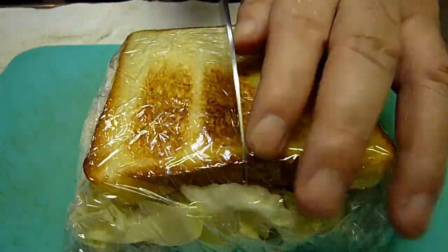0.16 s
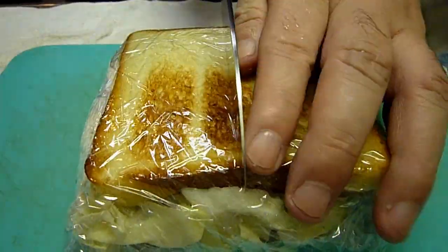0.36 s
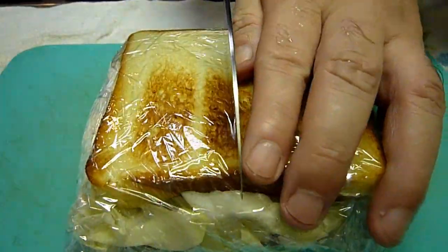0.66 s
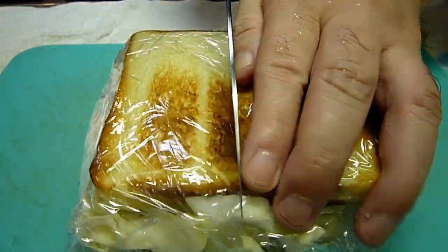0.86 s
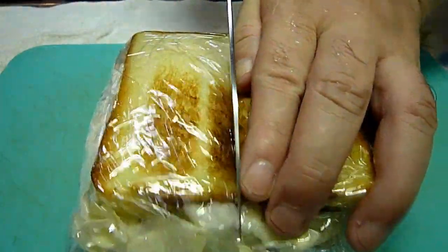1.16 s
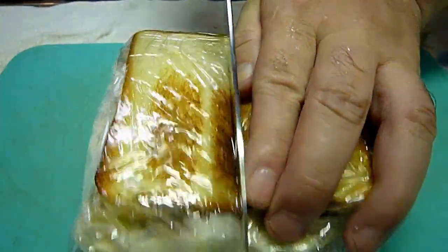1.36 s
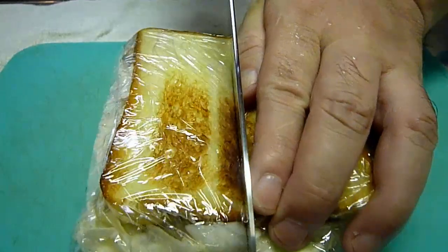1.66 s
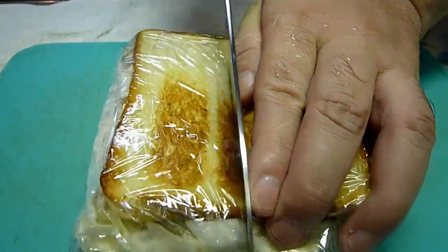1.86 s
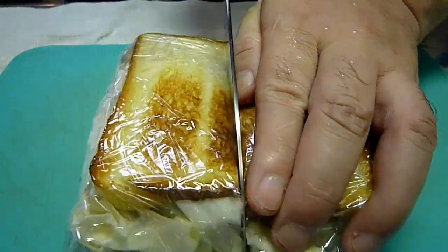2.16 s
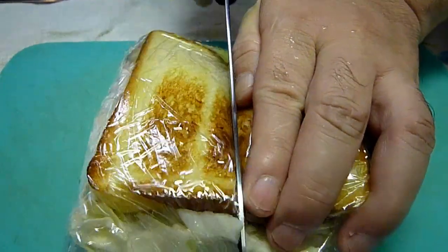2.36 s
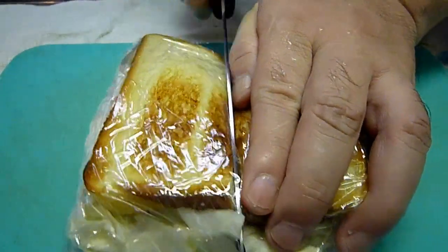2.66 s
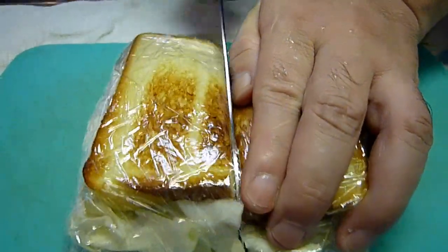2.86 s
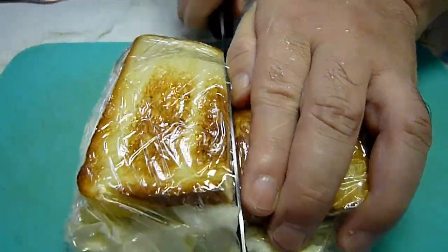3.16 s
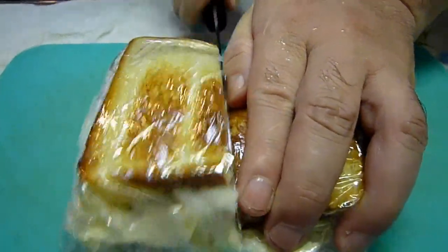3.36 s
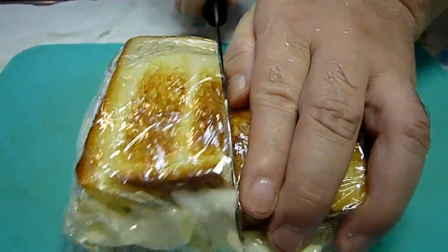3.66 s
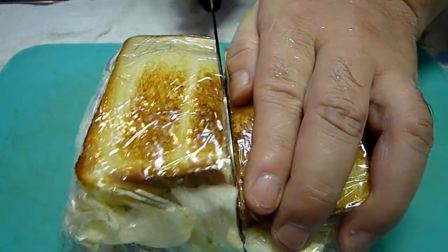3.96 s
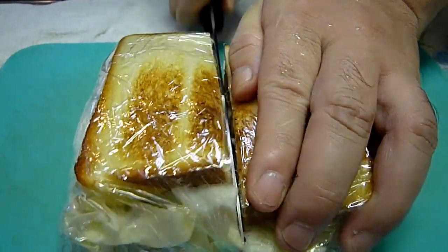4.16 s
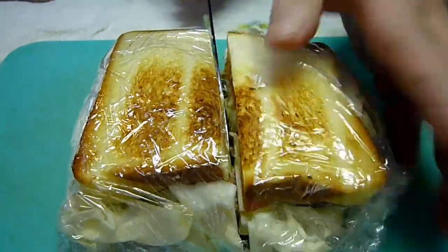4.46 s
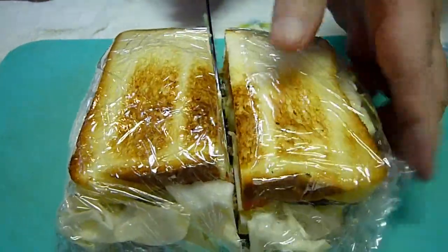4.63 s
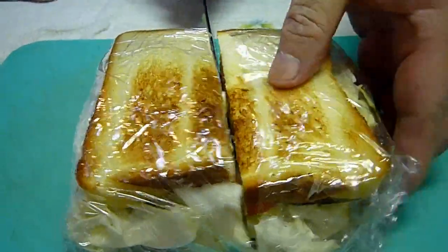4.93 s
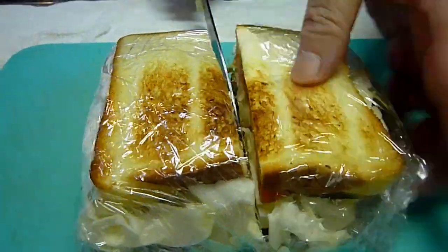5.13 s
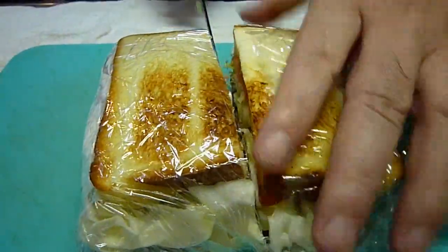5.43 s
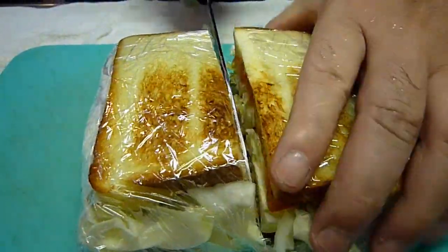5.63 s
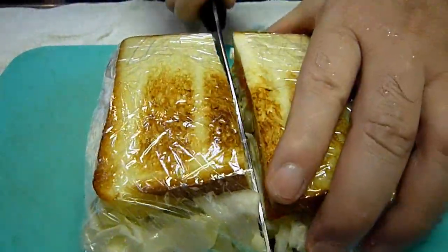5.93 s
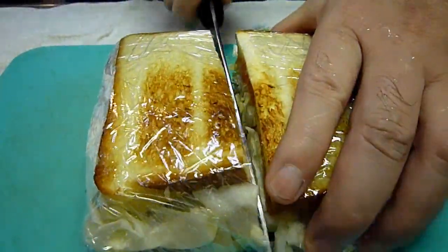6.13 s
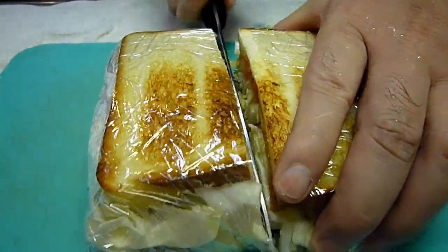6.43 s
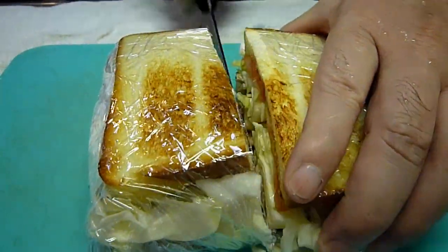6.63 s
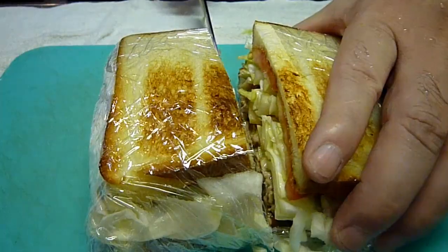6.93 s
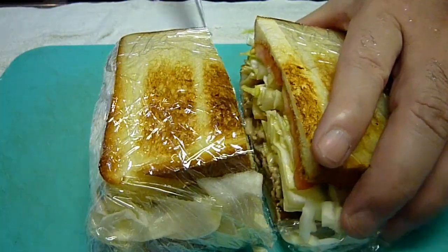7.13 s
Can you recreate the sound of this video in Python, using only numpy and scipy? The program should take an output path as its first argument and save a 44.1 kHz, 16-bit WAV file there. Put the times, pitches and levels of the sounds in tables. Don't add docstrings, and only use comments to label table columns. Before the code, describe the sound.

Close, dry crunching strokes of a blade through film-wrapped toast, softer in the filling, a rustling pause, then hard thumping final cuts.

```python
import sys
import numpy as np
from scipy import signal
from scipy.fft import rfft, irfft, dct, next_fast_len
from scipy.io import wavfile
from scipy.ndimage import uniform_filter1d, map_coordinates

SR = 44100
rng = np.random.default_rng(int(sys.argv[2]) if len(sys.argv) > 2 else 0)


def file_out(sig):
    cols = np.atleast_2d(sig).T
    lim = np.clip(cols, -1, 1)
    pcm = np.round(lim * 32767).astype(np.int16)
    wavfile.write(sys.argv[1], SR, pcm)


def volts(x):
    e = np.asarray(x, float) / 20
    return 10 ** e


N = 321489

# (pitch [Hz], width [Hz], level [dB])
BOARD_LOW = [(153.4, 11, -0.5), (195, 15, -3), (235.8, 25, -3.5)]
BOARD_HIGH = [(359.5, 25, 1), (410.4, 20, 4), (458.2, 64, -0.5), (580, 190, -11)]
BITING = (0.45, 2)


def unit(x, span=.09):
    width = round(span * SR)
    power = uniform_filter1d(uniform_filter1d(x ** 2, width), width)
    return x / np.sqrt(np.abs(power) + 1e-20)


def curves(rows):
    s, *cols = np.transpose(rows)
    index = np.arange(len(s))
    place = np.interp(np.arange(N) / SR, s, index)
    eased = place - 0.24 * np.sin(2 * np.pi * place) / (2 * np.pi)
    return [np.interp(eased, index, c) for c in cols]


def filtered(x, response):
    m = next_fast_len(N + SR // 2)
    return irfft(rfft(x, m) * response(np.fft.rfftfreq(m, 1 / SR)), m)[:N]


def colour(points):
    f, db = np.transpose(points)
    return lambda hz: volts(np.interp(np.log(hz + 1), np.log(f + 1), db))


def modes(rows):
    def response(f):
        total = 0
        for k, (hz, wide, db) in enumerate(rows):
            total = total + (-1) ** k * volts(db) * 1j * f * wide / (hz * hz - f * f + 1j * f * wide)
        return total
    return response


def wobble(rate):
    coarse = np.arange(0, N + 32, 32)
    knots = rng.standard_normal(int(N * 200 / SR) + 4)
    return np.interp(np.arange(N), coarse, map_coordinates(knots, [coarse * min(rate, 199) / SR]))


def cracks(rate, spread_db, clump_db, bed):
    chance, size = rng.random(N), rng.exponential(size=N)
    sign, rub = rng.standard_normal(N), rng.standard_normal(N)
    breaks = (chance < rate / SR) * sign * volts(spread_db * size)
    return volts(clump_db * wobble(70)) * (breaks / breaks.std() + bed * rub)


def patchy(x, depth_db):
    z = signal.stft(x, nperseg=512)[2]
    field = uniform_filter1d(rng.standard_normal(z.shape), size=3, axis=0)
    field = uniform_filter1d(field, size=7, axis=1)
    return signal.istft(z * volts(depth_db * field / field.std()), nperseg=512)[1][:N]


def efforts(groups, rest_db):
    t = np.arange(0, N + 64, 64) / SR
    power = volts(np.array(rest_db)[:, None]) ** 2
    edge_db = 18
    for rows, (rising, square) in groups:
        for s, length, force_db, *shares_db in rows:
            away = np.where(t < s, (s - t) / rising, (t - s) / (1 - rising)) / length
            layers_db = force_db + np.array([[0.0037, *shares_db]]).T
            power = power + volts(layers_db - edge_db * away ** square) ** 2
    return [np.interp(np.arange(N) / SR, t, layer) for layer in 10 * np.log10(power)]


def kitchen():
    # (pitch [Hz], level [dB])
    murmur = [(8.8, -15), (15, -1), (35, -16.5), (46, -13), (54, -57), (290, -28.5), (366, -52.5),
              (600, -99), (780, -113), (1320, -120)]
    return volts(-68.0) * unit(filtered(rng.standard_normal(N), colour(murmur)), span=1.0)


def room_noise():
    # (time [s], level [dB])
    noise_curve = [(0, -98.5), (.17, -72), (.25, -56), (.29, -67.5), (.35, -58), (.41, -80), (.47, -66),
                   (.85, -64), (.95, -58), (4.5, -60), (5.4, -62.5), (5.8, -63), (6.0, -62.5), (6.9, -59),
                   (7.29, -61.5)]
    # (pitch [Hz], width [Hz], level [dB])
    noise_tones = [(845, 110, -3), (1110, 390, -1), (1400, 190, -1.5)]
    hiss = filtered(patchy(rng.standard_normal(N), depth_db=9.5), lambda f: modes(noise_tones)(f) ** 2)
    return volts(curves(noise_curve)[0]) * unit(hiss)


def slips():
    # (time [s], length [s], force [dB])
    slip_table = [
        (4.745, 0.067, -47),
        (5.268, 0.046, -43.5),
        (7.1, 0.14, -77),
        (7.2, 0.098, -49),
        (7.215, 0.032, -38.5),
    ]
    # (pitch [Hz], width [Hz], level [dB])
    tight_wrap = [(1290, 460, 4.5), (1695, 57, -13), (2450, 140, -8), (3267, 330, -20.5),
                  (4830, 230, -16.5)]
    level_db, = efforts([(slip_table, BITING)], [-120])

    def film(f):
        return sum(volts(db) * modes([(hz, wide, 0)])(f) ** 2 for hz, wide, db in tight_wrap)
    return volts(level_db) * unit(filtered(rng.standard_normal(N), film))


def squeaks():
    # (time [s], peak level [dB], pitch [Hz])
    squeak_table = [(2.765, -61, 12400), (2.765, -64, 10100), (3.432, -61, 11350), (3.838, -62, 11300),
                    (3.955, -42, 8000), (4.178, -62, 11400), (5.18, -68, 4830), (6.1, -62, 11200),
                    (6.12, -61.5, 12000), (6.575, -60, 11100), (6.78, -59, 9700), (7.208, -61.5, 11350)]
    half_s = 0.014
    t, out = np.arange(N) / SR, np.zeros(N)
    for s, db, hz in squeak_table:
        near = slice(round((s - .05) * SR), round((s + .05) * SR))
        swell = np.exp(-((t[near] - s) / half_s) ** 2)
        out[near] += volts(db) * swell * np.sin(2 * np.pi * hz * t[near])
    return out


def board():
    # (time [s], length [s], force [dB], blade
    # contact [dB], heave [dB])
    pushes = [(.02, 0.06, -56.5, -20, 4), (.57, 0.17, -53, 6, -13), (.82, 0.16, -65.5, 12, 0),
              (.97, 0.048, -55, -17, -12), (1.06, 0.15, -53.5, 7, -18), (1.36, 0.16, -48.5, 7, -8),
              (1.68, 0.31, -48.5, -1, -2.5), (1.89, 0.19, -52.5, -0.5, -3.5),
              (2.045, 0.17, -40, 5.5, 1), (2.25, 0.19, -52, -0.5, -15), (2.43, 0.13, -37, 0, -31),
              (2.77, 0.14, -36.5, -5, -17), (2.94, 0.057, -41.5, -9.5, -20),
              (3.07, 0.4, -49.5, -33, -2), (3.3, 0.11, -42, -3.5, -27), (3.4, 0.058, -52.5, 3, 5),
              (3.5, 0.23, -46, -5, -5), (3.59, 0.18, -40.5, -12.5, -2), (3.68, 0.23, -40.5, -7, -12),
              (3.9, 0.28, -46, -4.5, -2), (4.02, 0.16, -46, -2, -6), (4.14, 0.24, -41, -4.5, -7.5),
              (4.3, 0.49, -53, -5.5, -3.5),
              (4.51, 0.033, -61, 13, 0.5), (4.769, 0.17, -47, -3.5, -9), (4.881, 0.18, -49, 0.5, -6),
                   (5.04, 0.098, -37.5, -7.5, -13), (5.1, 0.095, -49.5, 6.5, -26),
                   (5.158, 0.17, -40, 2.5, -14), (5.501, 0.12, -43.5, -17, -13),
                   (6.116, 0.11, -30.5, 0.5, -17), (6.246, 0.063, -23, -7, -30),
                   (6.29, 0.092, -31, 7.5, -27), (6.37, 0.33, -38, 1, -15), (6.459, 0.041, -36.5, -15, -18),
                   (6.56, .17, -39, 6.5, -12), (6.74, 0.19, -52, 3, 3), (6.901, 0.33, -53.5, -3.5, -3),
                   (7.078, 0.14, -50.5, 4.5, -11), (7.22, 0.11, -67, 26.5, -5.5)]
    # (pitch [Hz], width [Hz], level [dB])
    counter_tones = [(64, 29, -3), (31, 5, -12), (114.9, 33, -6)]
    pressing = (0.59, 1.3)
    idle_db = (-58.5, -62, -57)
    levels = efforts([(pushes, pressing)], idle_db)
    low_db, high_db, counter_db = [db + 3 * wobble(8.2) * (db < -52) for db in levels]

    def ring(rows, jolts):
        def body(f):
            return modes(rows)(f) * f ** 6 / (f ** 6 + 135 ** 6) / (1 + (f / 570) ** 6)
        return unit(filtered(jolts, body))
    low = ring(BOARD_LOW, cracks(90, spread_db=3.0, clump_db=0.0, bed=0.61))
    high = ring(BOARD_HIGH, cracks(120, spread_db=1.9, clump_db=2.5, bed=0.66))
    counter = unit(filtered(rng.standard_normal(N), lambda f: modes(counter_tones)(f) ** 2), span=0.66)
    return volts(low_db + 0.7) * low + volts(high_db - 1.5) * high + volts(counter_db + 0.37) * counter


def landings():
    # (time [s], peak level [dB], pitch [Hz], time to fall 60 dB [s])
    landing_table = [(2.059, -20, 153, 0.17), (2.415, -15.5, 234, 0.069), (2.416, -36, 540, 0.09),
                     (2.765, -28.5, 67.4, 0.2), (4.12, -29, 171, 0.2), (4.747, -28, 422.5, 0.12),
                     (5.032, -32, 245, 0.063), (5.148, -31.5, 243.5, 0.19), (6.086, -13.5, 441, 0.05),
                     (6.122, -14, 251, 0.07), (6.233, -13.5, 248, 0.11), (6.273, -15, 395.3, 0.16),
                     (6.313, -23, 160, 0.19), (6.531, -20.5, 404, 0.035), (6.562, -22.5, 423, 0.11),
                     (6.525, -26, 248, 0.11), (6.585, -29, 250, 0.13), (6.543, -26.5, 470, 0.074),
                     (6.59, -24.5, 423, 0.09), (6.293, -15, 334, 0.042)]
    out, t = np.zeros(N + SR), np.arange(SR // 3) / SR
    for s, db, hz, t60 in landing_table:
        swell = 1 - np.exp(-t / 0.0056)
        out[round(s * SR):][:len(t)] += volts(db - 60 * t / t60) * swell * np.sin(2 * np.pi * hz * t)
    return out[:N]


def ticks():
    # (time [s], peak level [dB], pitch [Hz])
    tick_table = [(1.3898, -39.7, 3710), (1.4167, -30, 3400), (1.4269, -28.5, 4470), (1.682, -27.5, 3340),
                  (1.689, -29.5, 3880), (1.7057, -21.5, 3190), (1.7502, -32.5, 3130), (1.7553, -35, 2540),
                  (1.7682, -37.5, 3040), (1.8597, -29.5, 4050), (1.8696, -24.5, 3800),
                  (1.8767, -20.5, 4300), (1.8802, -29, 4300), (1.8874, -36.8, 4700), (1.9802, -41, 3580),
                  (2.0205, -27.5, 2900), (2.025, -24, 3440), (2.0727, -18, 2390), (2.0763, -35, 2270),
                  (2.0867, -34, 3120), (2.2062, -32.5, 2480), (2.2161, -36.5, 3430), (2.3555, -39.5, 2750),
                  (2.3612, -33.5, 3010), (2.378, -26, 2450), (2.3984, -22.5, 3260), (2.4169, -8.5, 3130),
                  (2.4264, -31, 3080), (2.4362, -34, 2970), (2.5588, -50, 2110), (2.7414, -24, 2070),
                  (2.759, -30, 2180), (2.7657, -25.5, 1860), (2.903, -44, 2870), (3.199, -35.5, 1800),
                  (3.3081, -56, 4750), (3.3974, -38, 2630), (3.4265, -32.5, 2760), (3.4366, -33, 2780),
                  (3.6765, -35.0, 2550), (3.69, -32.5, 2100), (3.7038, -36.1, 2360), (3.7193, -36.5, 2260),
                  (3.8655, -37, 2060), (3.9585, -39, 2180), (3.978, -31.5, 2410), (4.1702, -37.6, 3200),
                  (4.2012, -35, 2160), (4.4898, -42.5, 2180), (6.0861, -37.5, 1880), (6.1023, -42, 2040),
                  (6.1058, -29.5, 2240), (6.1253, -29, 1870), (6.2324, -33, 2800), (6.2374, -24, 2700),
                  (6.2496, -44.5, 2250), (6.2765, -39, 4250), (6.2967, -26.5, 3410), (6.401, -42, 3400),
                  (6.5482, -31.5, 2050)]
    out, t = np.zeros(N + SR), np.arange(SR // 200) / SR
    for s, db, hz in tick_table:
        grit = 0.4 * rng.standard_normal(len(t))
        fade = volts(db + 3.5 - 60 * t * hz / 6.7)
        out[round(s * SR):][:len(t)] += fade * (np.sin(2 * np.pi * hz * t) + grit)
    return out[:N]


def snaps():
    # (time [s], peak level [dB], pitch [Hz], knock [dB], spit [dB])
    snap_table = [(0.922, -42, 920, -22, -52), (1.187, -59, 1000, -8, -3), (1.367, -30, 1200, 13, -35),
                  (1.525, -44, 1280, -23, -30), (1.605, -37, 1180, -1, -40), (1.687, -32, 1310, -33, 2.5),
                  (1.869, -29.5, 3040, -22, -17.5), (1.979, -37, 854, -22, -12),
                  (2.038, -27.5, 1960, -8, -20), (2.07, -23.5, 880, -22, -12),
                  (2.357, -31.5, 1150, -19, -28), (2.375, -25.5, 1135, -9, -21),
                  (2.394, -32.5, 1060, 2, -5.5), (2.4173, -12.5, 994, -20, -12),
                  (2.422, -17.5, 1020, -19, -18.5), (2.558, -34, 1800, -19, -7), (2.737, -45, 876, 2, -18),
                  (2.741, -21, 1290, -4, -10.5), (2.758, -17, 1230, -8, -15),
                  (2.763, -17.5, 1230, -5, -19),
                  (3.023, -42.5, 1170, -10, -6), (3.064, -36, 1110, -2, -21), (3.271, -39, 1200, -13, -20),
                  (3.674, -30.5, 1340, 10, -26), (3.704, -29, 1360, -25, -15.5),
                  (3.785, -43, 1040, 24, -10), (3.931, -37, 1400, -9, -30), (3.953, -35, 1230, 7, -1),
                  (4.474, -33.5, 1220, -17, -28), (4.729, -34, 1207, 13.5, -38), (4.852, -37, 1145, 3, -62),
                  (6.087, -28.5, 1050, 26.5, -30), (6.12, -24, 1700, 10, -17), (6.218, -40, 1100, 15, -4),
                  (6.646, -36, 1060, -19, -23)]
    out, knocks, t = np.zeros(N + SR), np.zeros(N), np.arange(SR // 40) / SR
    for s, db, hz, knock_db, spit_db in snap_table:
        ring = np.sin(2 * np.pi * hz * t) * volts(-60 * t / 0.0062) * (1 - np.exp(-t / 0.000082))
        grit = np.diff(uniform_filter1d(rng.standard_normal(len(t) + 1), size=7))
        spit = volts(spit_db + 22.5) * grit * volts(-60 * t / 0.0018)
        out[round(s * SR):][:len(t)] += volts(db + 3.5) * (ring + spit)
        knocks[round(s * SR)] = volts(db + knock_db + 21.5)

    def cushioned(f):
        return modes(BOARD_LOW + BOARD_HIGH)(f) / (1 + 1j * f / 900) ** 2
    return out[:N] + filtered(knocks, cushioned)


def sandwich():
    # (time of most force [s], length [s], force [dB], crispness [dB], tearing [dB])
    crust_strokes = [(1.045, 0.14, -51.5, -7.5, -10), (1.085, 0.13, -53, -8.5, -14),
                     (1.22, 0.11, -49.5, -6.5, -12), (1.37, 0.14, -44.5, -10, -12),
                     (1.43, 0.078, -44.5, -12, -4), (1.54, 0.097, -42.5, -9.5, -15),
                     (1.695, 0.12, -37.5, -5.5, -11), (1.75, 0.12, -43.5, -3.5, -10.5),
                     (1.875, 0.073, -43.5, 1, 5.5), (1.99, 0.1, -40.5, -17, -13),
                     (2.027, 0.051, -35.5, -1, -3), (2.058, 0.1, -29.5, -7, -11.5),
                     (2.195, .13, -49, -1.5, -8.5), (2.36, 0.063, -44.5, -5, -6.5),
                     (2.43, 0.095, -31, -8.5, -10.5), (2.57, 0.1, -47, -4, -11),
                     (2.755, 0.11, -39, -5.5, -19), (2.81, 0.045, -48.5, -2.5, -12),
                     (2.905, 0.08, -48, -2.5, -7.5)]
    filling_strokes = [(3.03, 0.074, -54, -1.5, -17), (3.07, 0.066, -47, -14, -16),
                       (3.175, 0.092, -46, -11.5, -14.5), (3.275, 0.083, -41, -14.5, -18),
                       (3.31, 0.053, -45, -6.5, -4.5), (3.418, 0.088, -41.5, -4.5, -15),
                       (3.55, 0.14, -42.5, -10, -23.5), (3.691, 0.11, -39, -6, -13.5),
                       (3.835, 0.13, -39.5, -10, -18), (3.96, 0.097, -40.5, -3.5, -12.5),
                       (4.03, 0.072, -41.5, -10.5, -15), (4.145, 0.12, -39, -11.5, -22.5),
                       (4.19, 0.066, -42.5, -8.5, -14.5), (4.28, 0.16, -47.5, -8.5, -13),
                       (4.37, 0.18, -51, -7, -14.5), (4.49, 0.069, -51.5, -10, -6.5)]
    last_strokes = [(4.67, 0.091, -50.5, -17.5, -31), (4.75, 0.13, -51.5, -23.5, -30),
                    (4.859, 0.058, -50.5, -22, -25), (5.121, 0.19, -51, -13, -32),
                    (5.261, 0.074, -49, -15, -28.5), (6.041, 0.29, -54.5, -8, -11),
                    (6.118, 0.085, -37, -3.5, -20), (6.266, 0.15, -38, -11, -16),
                    (6.411, 0.16, -47, -7.5, -13), (6.564, 0.092, -37.5, -7, -21.5),
                    (6.713, 0.13, -40.5, -9.5, -17.5), (6.76, 0.11, -56.5, -1, -1),
                    (6.813, 0.24, -54, -9.5, -15), (7.101, 0.36, -56, -10.5, -23.5),
                    (7.198, 0.15, -57.5, 0.5, -12.5)]
    # (pitch [Hz], width [Hz], level [dB])
    bread = [(1040, 30, -2), (1230, 138.7, 2), (1425, 69.6, 0), (1700, 120, 0), (728, 600, -2.5)]
    # (pitch [Hz], width [Hz], level over the crust [dB])
    blade = [(1869, 72, 7.5), (2117, 45, 6), (2380, 39, -6), (2817, 45, -3.5), (3340, 36, 1.5),
             (4240, 18, -9.5), (4680, 52, 4), (4970, 23, -6.5)]
    # (pitch [Hz], level per Hz [dB])
    crust_colour = [(880, -43), (1500, -7), (1890, -3.5), (2040, -8), (2330, -3.5), (2650, -3.5),
                    (3290, -6), (5440, -11), (8000, -23.5), (10400, -52), (17600, -120)]
    film_colour = [(4710, -33.5), (8000, -24), (8370, -2), (10500, 0), (12700, -4), (14500, -20)]
    sawing = (0.56, 1.35)
    rest_db = (-73.5, -77.5, -86.5)
    strokes = [(crust_strokes, sawing), (filling_strokes + last_strokes, BITING)]
    crumb_db, crust_db, splinter_db = efforts(strokes, rest_db)
    film_db = splinter_db - 13.5

    shared = cracks(900, spread_db=1.0, clump_db=0.5, bed=1.0)
    crumb = 1.1 * shared + cracks(400, spread_db=-0.5, clump_db=-2.0, bed=0.9)
    crumb = filtered(patchy(crumb, depth_db=3), modes(bread))
    breaks = 1.6 * shared + cracks(1200, spread_db=2.5, clump_db=4.0, bed=0.7)
    breaks = patchy(breaks, depth_db=4.0)
    breaks = filtered(breaks, lambda f: 1 + sum(modes([mode])(f) for mode in blade))

    def high(f):
        return f ** 8 / (f ** 8 + 4110.0 ** 8)
    crust = filtered(breaks, lambda f: colour(crust_colour)(f) * (1 - high(f)))
    splinters = filtered(breaks, lambda f: colour(crust_colour)(f) * high(f))
    film = patchy(cracks(2700, spread_db=-4.5, clump_db=3.0, bed=0.81), depth_db=3.0)
    film = volts(1.1 * film_db + 11.5) * unit(filtered(film, colour(film_colour)))
    brittle = volts(crust_db - 0.37) * unit(crust) + volts(0.91 * splinter_db - 7.5) * unit(splinters)
    biting = volts(np.minimum(0, 0.53 * (crumb_db + 57)))
    return volts(crumb_db - 2.5) * unit(crumb) + biting * (brittle + film)


def scene():
    breaks = filtered(snaps() + ticks(), lambda f: 1 / (1 + 1j * f / 6000) ** 3)
    faint = room_noise() + slips() + squeaks()
    return (kitchen() + faint + board() + landings() + breaks + sandwich())[None]


def camera(x):
    hop, step, start = 1024, volts(-14.5), 862
    window = np.sin(np.pi * (np.arange(2 * hop) + .5) / (2 * hop))
    count = N * 160 // 147
    fast = np.pad(signal.resample(x, count), (2 * hop - start, 3 * hop))
    frames = np.lib.stride_tricks.sliding_window_view(fast, 2 * hop)[::hop] * window
    a, b, c, d = np.split(frames, 4, axis=1)
    lines = dct(np.hstack([-c[:, ::-1] - d, a - b[:, ::-1]]), type=4) / (2 * step)
    steps = np.floor(np.abs(lines) ** (3 / 4) + 0.36)
    rounded = np.sign(lines) * steps ** (4 / 3) * step / hop
    late, early = np.split(dct(rounded, type=4), 2, axis=1)
    frames = np.hstack([early, -early[:, ::-1], -late[:, ::-1], -late]) * window
    joined = (frames[1:, :hop] + frames[:-1, hop:]).ravel()[hop - start:]
    return signal.resample(joined[:count], N)


def roll_off(x):
    return signal.sosfilt(signal.butter(12, 14850, fs=SR, output="sos"), x)


def record(dry):
    hz, wide, lost = 8200, 1100, .45
    heard = filtered(dry[0], lambda f: 1 - lost * modes([(hz, wide, 0)])(f))
    offset = -.0596
    return roll_off(camera(heard)[None] + offset)


dry = scene()
out = record(dry)
file_out(out)
```